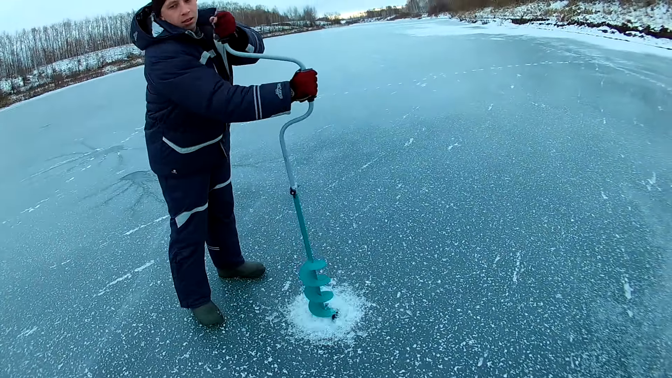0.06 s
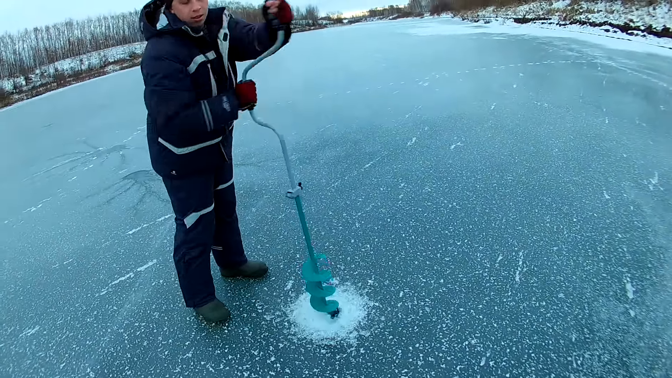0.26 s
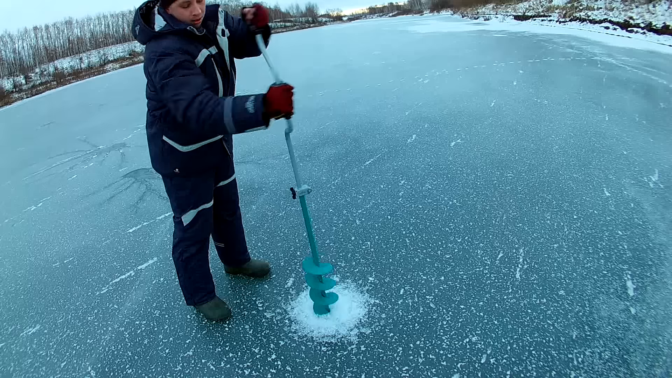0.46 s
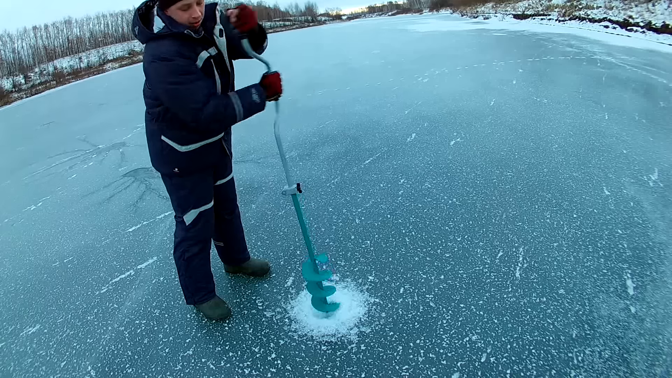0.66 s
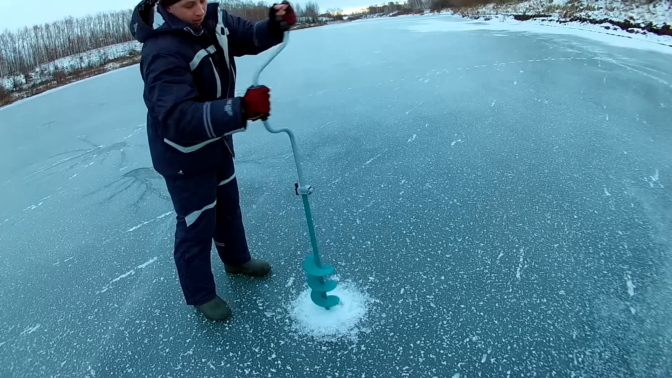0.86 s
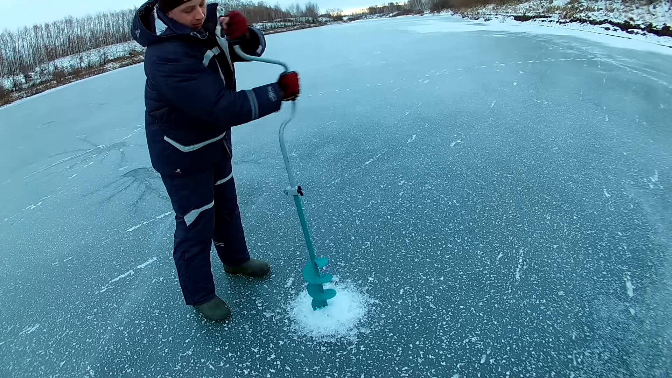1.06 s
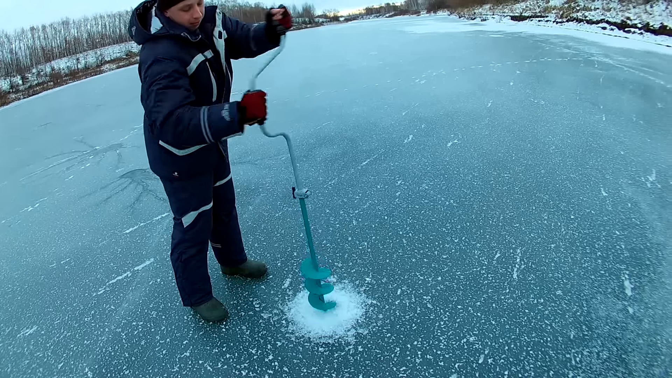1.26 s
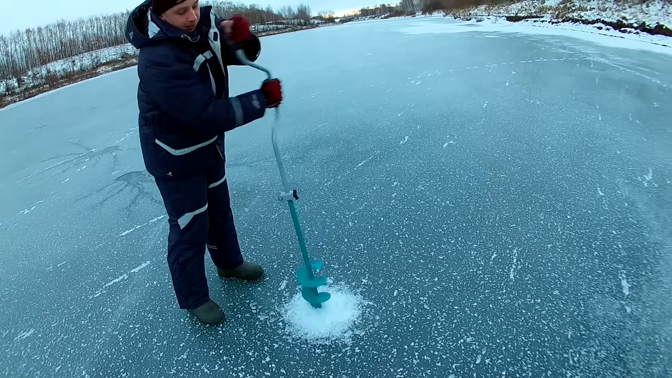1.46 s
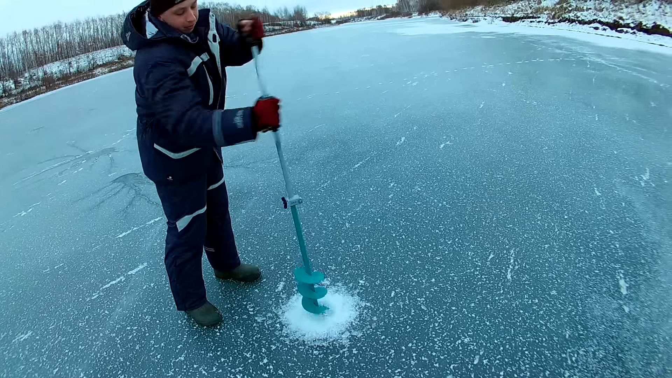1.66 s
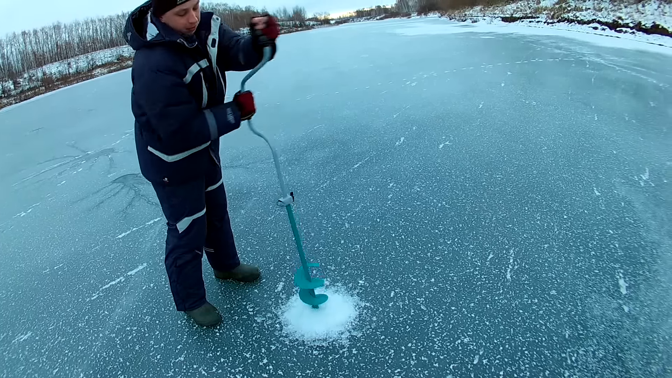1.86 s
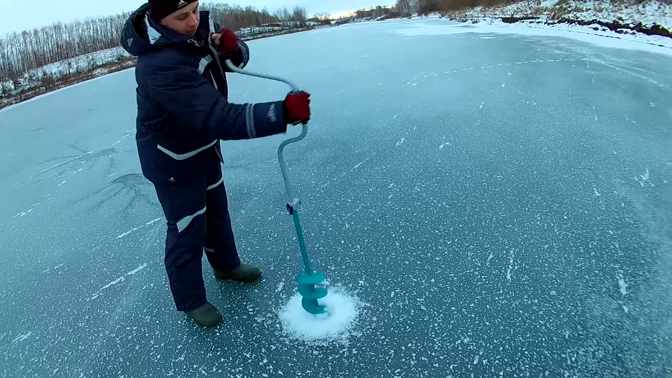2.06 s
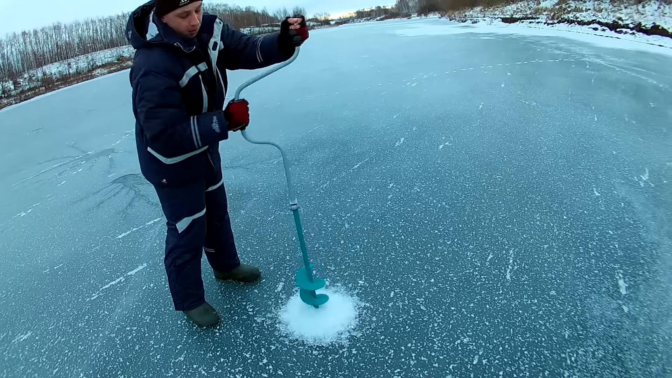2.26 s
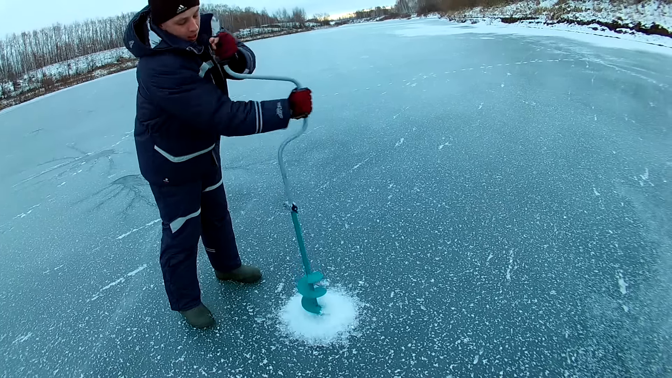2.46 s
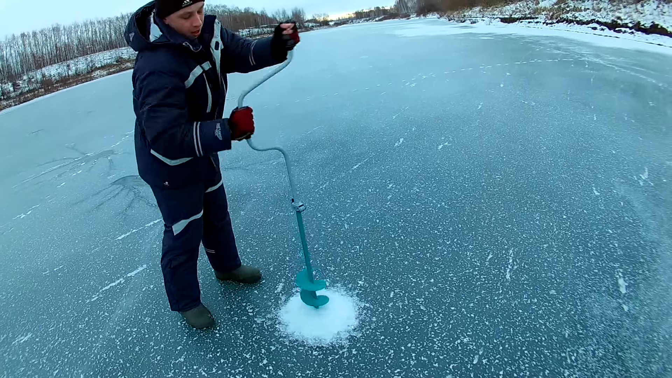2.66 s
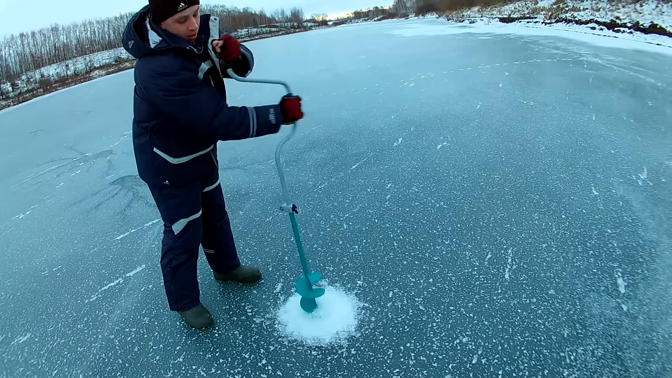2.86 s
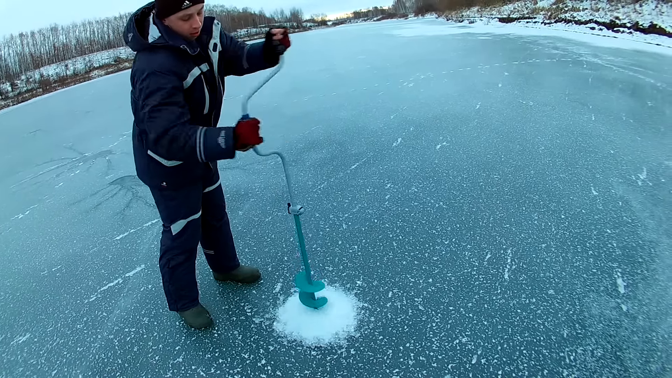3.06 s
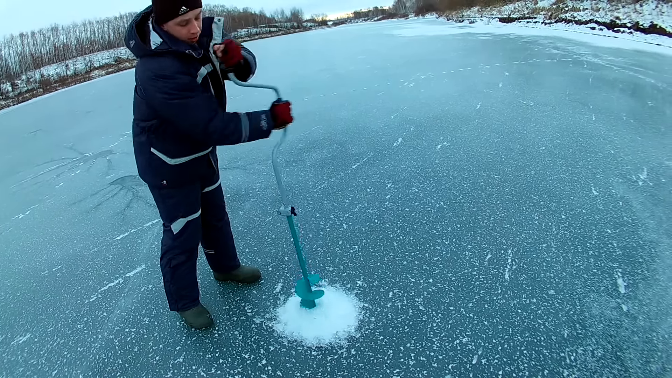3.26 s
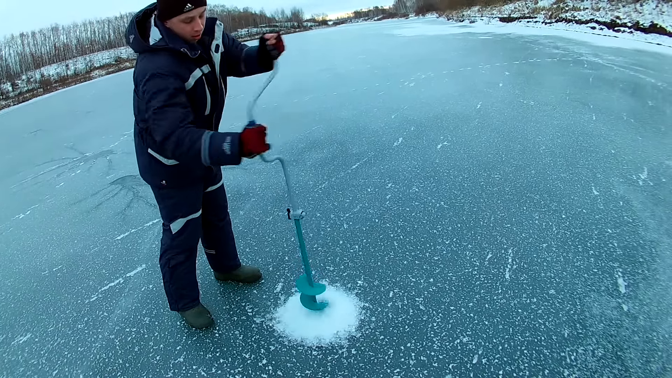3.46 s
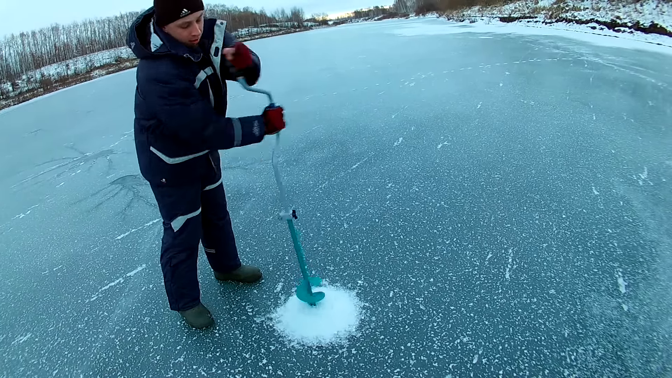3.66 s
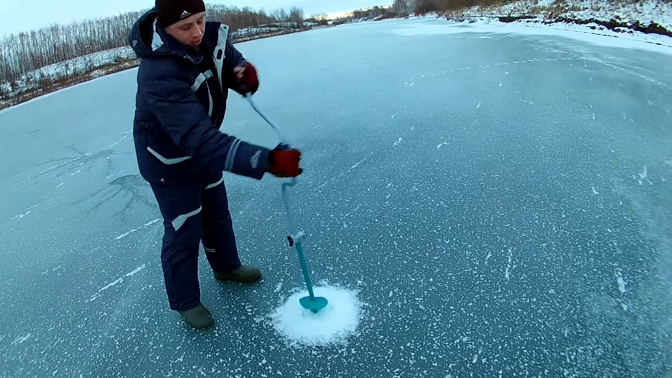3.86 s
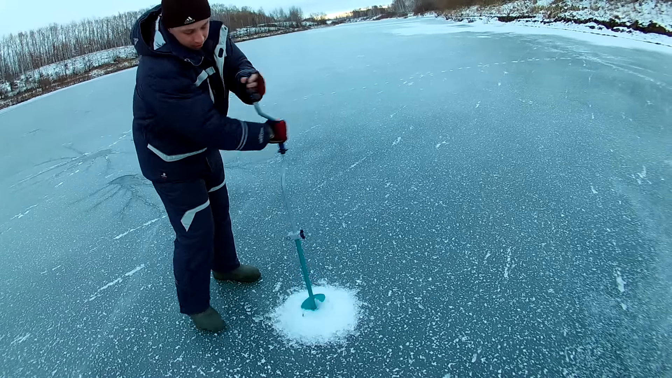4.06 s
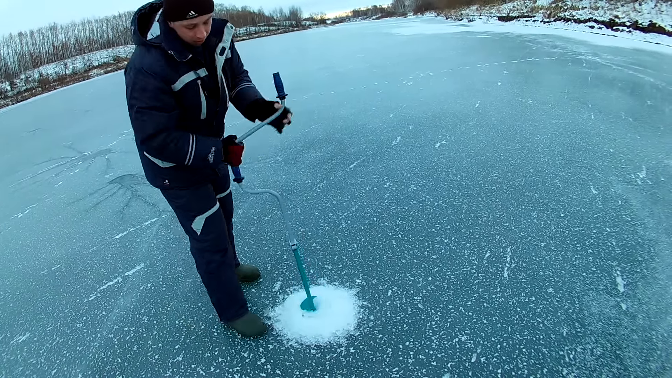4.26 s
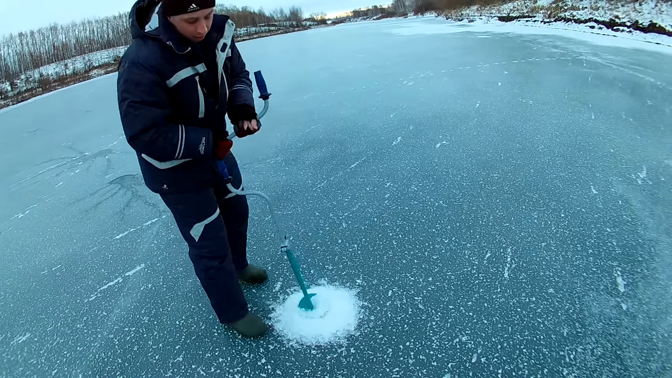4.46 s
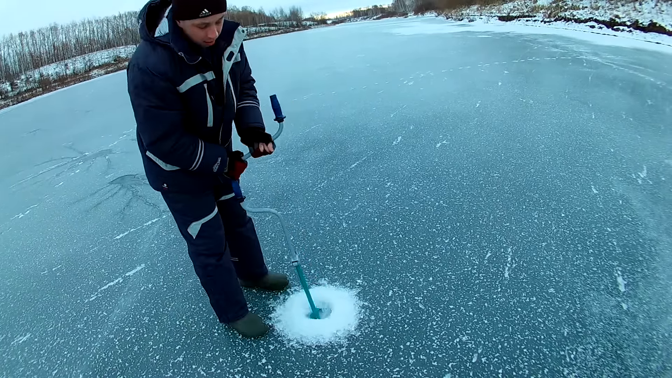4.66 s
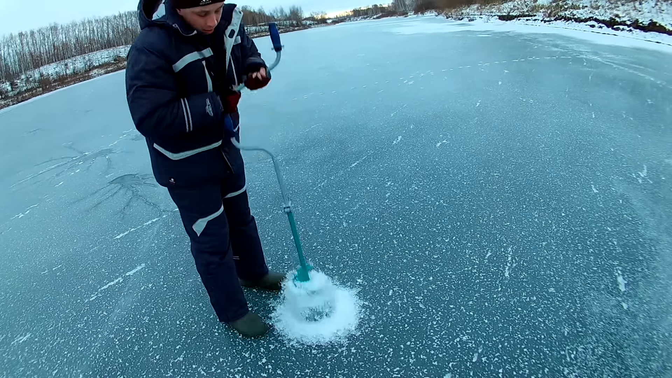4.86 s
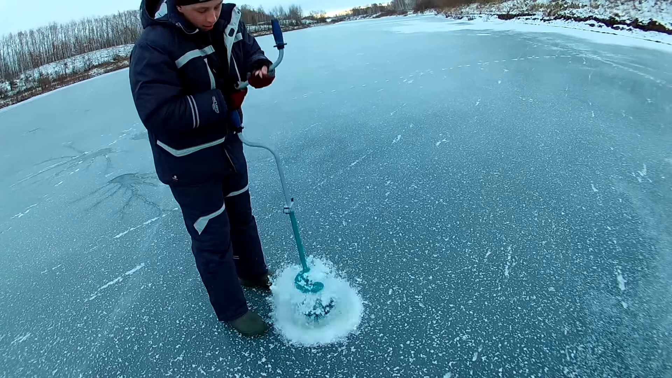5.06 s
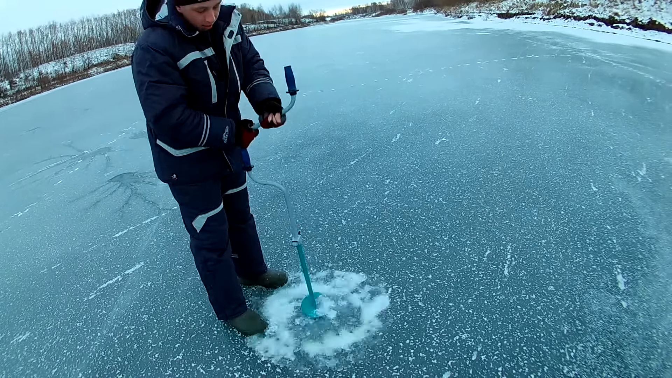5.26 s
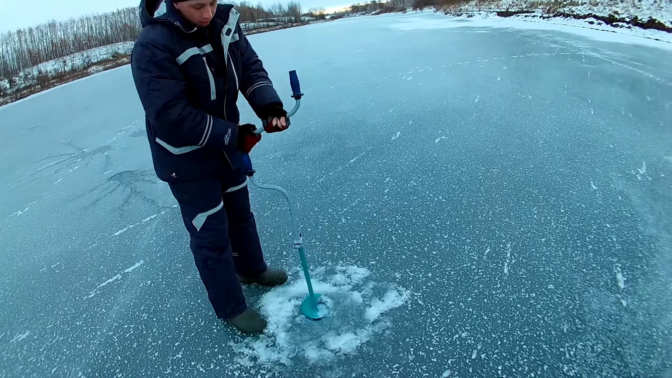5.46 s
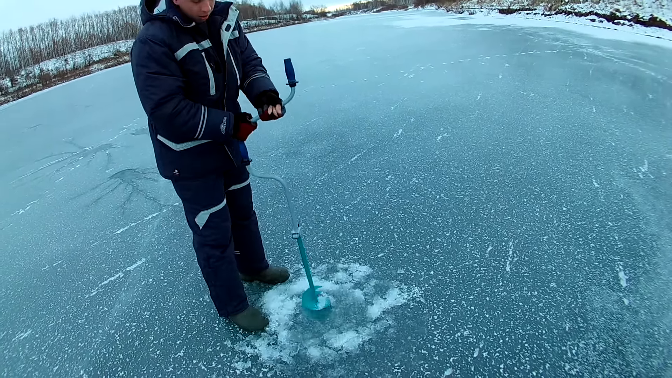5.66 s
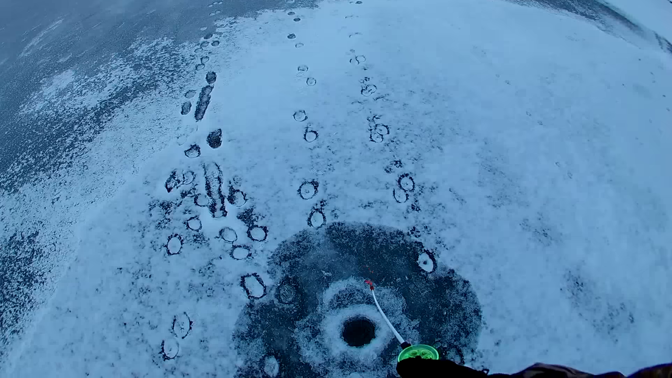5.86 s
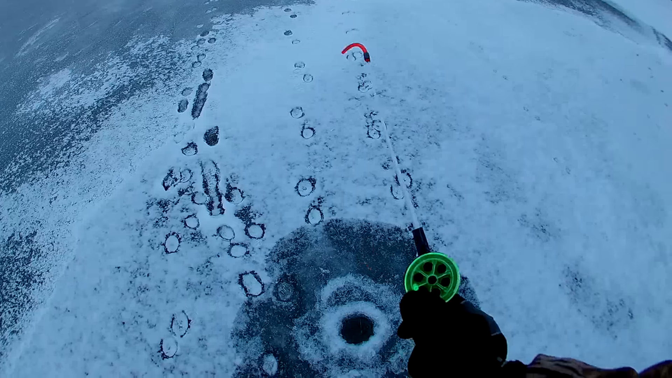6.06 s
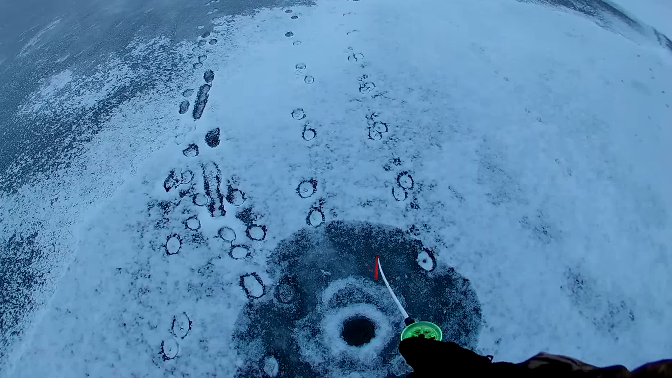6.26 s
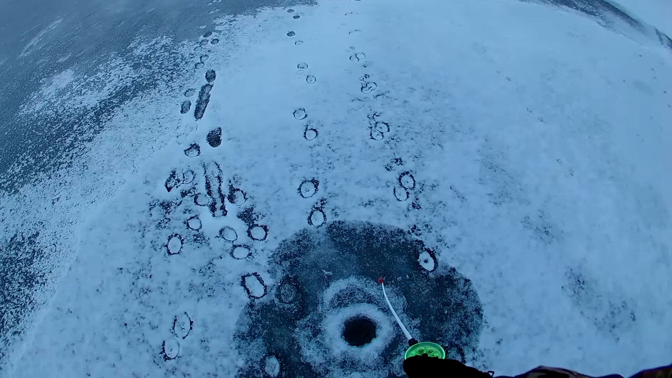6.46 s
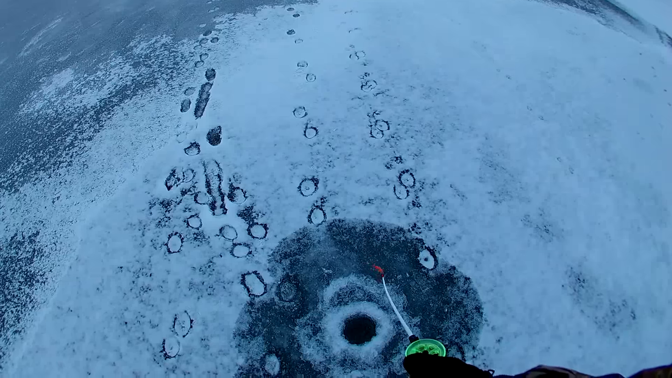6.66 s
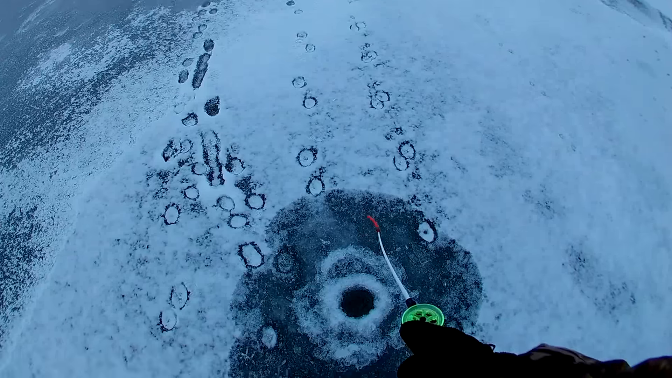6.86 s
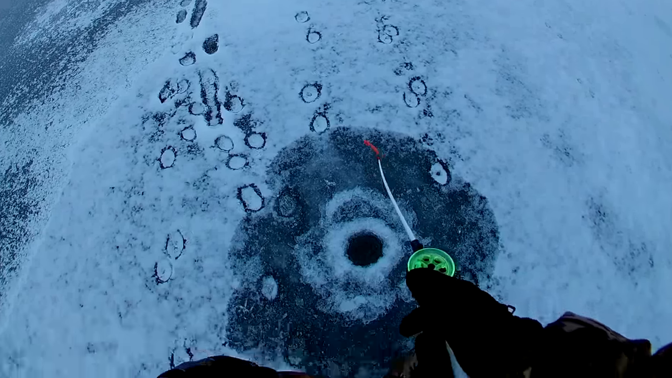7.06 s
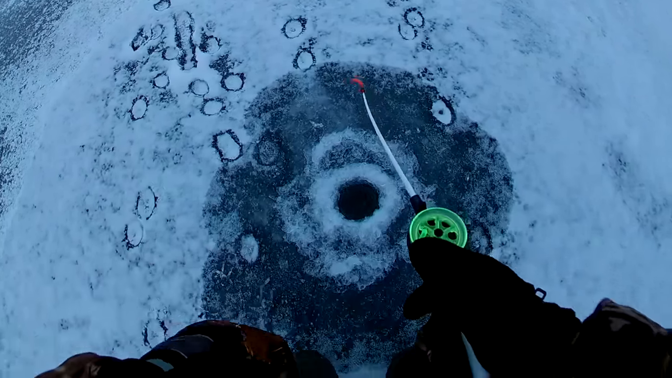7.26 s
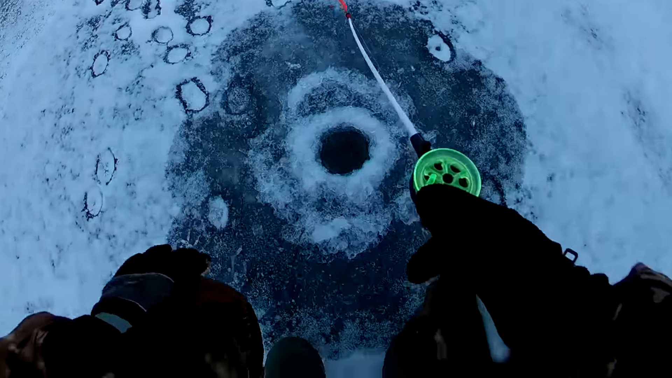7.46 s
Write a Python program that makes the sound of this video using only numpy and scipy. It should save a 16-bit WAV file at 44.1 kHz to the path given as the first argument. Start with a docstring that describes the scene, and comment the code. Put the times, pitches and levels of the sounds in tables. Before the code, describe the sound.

Gritty scraping and crunching pulses about five times every two seconds, with metallic ringing and sharp snaps from thick ice flakes. The grinding suddenly stops at breakthrough, followed by dull slush stirring, a faint squeak, hollow glugs, splashes and stray drips. The close microphone catches soft wind buffets. A hard switch leaves only faint open-air wind, then cloth rustle and light rod and reel clicks.

```python
"""Up close, a hand auger shaves pond ice: chips snap off and ring the steel flight and the deepening bore.
The blades break through; the free auger stirs slush, and water surges, gulps and spills in the hole.
Then the scene switches to a quiet fishing spot: faint wind, rustling clothes, a few ticks of rod and reel.
Random grains through resonances make steel, ice, cloth and spray; swelling tones make the trapped air;
filtered noise makes the wind and the buffets on the microphone."""
import sys
import numpy as np
from scipy import signal
from scipy.fft import rfft, irfft, next_fast_len
from scipy.io import wavfile
from scipy.ndimage import uniform_filter1d, map_coordinates

SR = 44100
rng = np.random.default_rng(int(sys.argv[2]) if len(sys.argv) > 2 else 0)


def generate_wav(sig):
    """Save sig (samples, or channels by samples) to the path in sys.argv[1] as 16-bit PCM at SR."""
    pcm = np.round(np.clip(np.atleast_2d(sig).T, -1, 1) * 32767).astype(np.int16)
    wavfile.write(sys.argv[1], SR, pcm)


N = 331632
T = np.arange(N) / SR
SIZE = next_fast_len(N + SR // 2, True)  # padded, so that filter tails do not wrap into the start
HZ = np.fft.rfftfreq(SIZE, 1 / SR)
THROUGH_S = 3.797  # the blades break through
SWITCH_S = 5.798  # the scene switches to the fishing spot
STROKE_ATTACK, STROKE_RELEASE = 0.77, 1.16  # shares of a stroke's length


def amp(db):
    """Amplitude factor for a level in dB."""
    return 10 ** (np.asarray(db) / 20)


def unit(x):
    """Scales to rms 1."""
    return x / np.sqrt(np.mean(x ** 2) + 1e-20)


def steady(x, span):
    """Evens the rms to about 1 over every span of seconds; faster grain stays."""
    power = np.abs(uniform_filter1d(x ** 2, int(span * SR) + 1))
    return x / np.sqrt(power + 1e-6 * np.mean(x ** 2))


def wobble(rate):
    """A smooth random curve, rate knots a second."""
    knots = rng.standard_normal(int(N * rate / SR) + 4)
    return map_coordinates(knots, [T * rate], order=2)


def after(s, fade):
    """Rises from 0 to 1 around time s."""
    return 0.5 + 0.5 * np.tanh((T - s) / fade)


def swell(s, rise, fall):
    """Climbs to 1 at time s and dies away; rise and fall reach to about half of that."""
    t = T - s
    return np.exp(1 - np.hypot(1, 1.437 * t / np.where(t < 0, rise, fall)))


def strokes(rows):
    """Summed power of (peak s, length s, dB) gestures that share one attack and release."""
    power = 0
    for s, length, db in rows:
        side = length * np.where(T < s, STROKE_ATTACK, STROKE_RELEASE)
        power = power + amp(db) ** 2 * np.exp(-((T - s) / side) ** 2)
    return power


def colour(points):
    """Causal (minimum-phase) response with the gain of the (Hz, dB) points."""
    f, db = np.transpose(points)
    gain_db = np.interp(np.log(HZ + 1), np.log(f), db)
    cepstrum = irfft(np.log(amp(gain_db)), SIZE)
    # folding the cepstrum forward makes the response causal
    cepstrum[1:SIZE // 2] *= 2
    cepstrum[SIZE // 2 + 1:] = 0
    return np.exp(rfft(cepstrum))


def modes(rows):
    """Causal response of a few (Hz, width Hz, dB) resonances with alternating signs."""
    response = 0
    for k, (hz, width, db) in enumerate(rows):
        resonance = 1j * HZ * width / (hz * hz - HZ * HZ + 1j * HZ * width)
        response = response + (-1) ** k * amp(db) * resonance
    return response


def filtered(x, response):
    """Passes a signal through a frequency response."""
    return irfft(rfft(x, SIZE) * response, SIZE)[:N]


def grains(rate, scatter):
    """Random impulses, rate a second, of uneven, log-normal size, rms 1."""
    size = np.exp(scatter * np.clip(rng.standard_normal(N), -2, 2))
    present = rng.random(N) < rate / SR
    return unit(present * size * rng.choice([-1, 1], N))


def bursts(rate, fall, base):
    """Uneven envelope of sudden starts, whose power dies away in fall seconds, rms 1."""
    kicks = (rng.random(N) < rate / SR) * rng.uniform(0.45, 1, N) ** 2
    power = base + signal.lfilter([1], [1, -np.exp(-1 / (fall * SR))], kicks)
    return unit(np.sqrt(power))


def strikes(times, db, response):
    """Single blows that each ring a body up to the given peak."""
    samples = np.round(np.asarray(times) * SR).astype(int)
    blows = np.bincount(samples, amp(db), N)[:N]
    return filtered(blows, response / np.abs(irfft(response, SIZE)).max())


def ping(t, hz, cycles, climb):
    """A shard or bubble rings for some cycles; a bubble also climbs in pitch."""
    age = t * hz / cycles
    tone = np.sin(2 * np.pi * hz * t * (1 + climb * age / 2))
    return tone * np.exp(-age) * (1 - np.exp(-2 * t * hz))


def cloud(count, hz, spread, cycles, climb):
    """A dense cloud of pings, each with its own pitch and size, rms 1."""
    t = np.arange(int(4 * SR * cycles / hz)) / SR
    pitch, size = np.clip(rng.standard_normal((2, count, 1)), -2, 2)
    rings = amp(6.9 * size) * ping(t, hz * np.exp(spread * pitch), cycles, climb)
    places = rng.integers(0, N, (count, 1)) + np.arange(len(t))
    return unit(np.bincount(places.ravel(), rings.ravel())[:N])


# Spectrum of the faint wind. Each row: frequency in Hz, relative level in dB per Hz.
WIND_SPECTRUM = [(20, -7.5), (60, -11.5), (120, -12), (200, -15.5), (300, -12.5), (400, -22), (490, -13),
                 (620, -21), (980, -15.5), (1350, -29.5), (1750, -36.5), (2600, -44.5), (5000, -48.5),
                 (15000, -53)]
# Spectrum of buffets at the microphone, also for nudges. Each row: frequency in Hz, relative level in dB per Hz.
BUFFET_SPECTRUM = [(15, 1), (35, -4.5), (80, 0.5), (160, -13.5), (350, -20.5), (900, -63)]
# Soft buffets on the microphone. Each row: peak in seconds, length in seconds, level in dB.
PUFFS = [(0, .1, -45), (.98, 0.17, -37), (1.35, 0.089, -38), (1.75, 0.11, -42.5), (4.24, .03, -35.5),
         (4.69, .04, -42)]
BREEZE_DB = -52  # steady buffeting beneath the puffs


def air():
    """Faint wind over the open ice is coloured noise; soft buffets reach the microphone while drilling."""
    wind = unit(filtered(rng.standard_normal(N), colour(WIND_SPECTRUM)))
    far = amp(-48.0 + 0.6 * wobble(12.0)) * wind
    breeze = np.hypot(amp(BREEZE_DB), np.sqrt(strokes(PUFFS)))
    puffs = breeze * unit(filtered(rng.standard_normal(N), colour(BUFFET_SPECTRUM)))
    return far + puffs * (1 - after(SWITCH_S, fade=0.002))


# The angler shifts and nudges the microphone. Each row: peak in seconds, length in seconds, level in dB.
NUDGES = [(6.74, 0.053, -43.5), (7.2, 0.0624, -32), (7.42, .07, -38.5)]
# Spectrum of rustling clothes. Each row: frequency in Hz, relative level in dB per Hz.
CLOTH_SPECTRUM = [(200, -0.5), (1100, 1), (1900, -8), (2500, -17), (3700, -15.5), (6000, -25.5),
                  (8000, -36), (15000, -57)]
# A sleeve brushes past. The single row: peak in seconds, length in seconds, level in dB.
SLEEVE_BRUSH = (7.44, 0.023, -45)
# Ticks of rod and reel. Each row: start in seconds, peak of the tick, rebound included, in dB.
TICKS = [(6.88, -25.5), (7.113, -13.5), (7.223, -26), (7.248, -23), (7.281, -26), (7.312, -30),
         (7.328, -34), (7.509, -29.5)]
# Resonances of the plastic rod and reel. Each row: frequency in Hz, width in Hz, relative level in dB.
REEL_MODES = [(752, 130, 2), (1090, 107, 7.5), (1600, 170, 1.5), (2100, 350, -4.5), (3510, 350, -8.5),
              (5300, 510, -18), (10500, 2500, -40)]
RUSTLE_DB, RUSTLE_START_S, RUSTLE_RISE_S = -44, 6.904, 0.14  # clothes begin to move


def angler():
    """Clothes rustle as fine grains and nudge the microphone; the plastic rod and reel tick when struck."""
    rumble = steady(filtered(rng.standard_normal(N), colour(BUFFET_SPECTRUM)), span=0.15)
    nudges = np.sqrt(strokes(NUDGES)) * rumble
    rustle = amp(RUSTLE_DB) * after(RUSTLE_START_S, RUSTLE_RISE_S)
    motion = np.hypot(rustle, np.sqrt(strokes([SLEEVE_BRUSH])))
    fibres = unit(filtered(grains(rate=5000, scatter=0.52), colour(CLOTH_SPECTRUM)))
    cloth = motion * amp(2.1 * wobble(25)) * fibres
    s, db = np.transpose(TICKS)
    rebound = 1 + 0.21 * np.exp(-2j * np.pi * HZ * 0.0027)  # the loose reel rebounds once, 2.7 ms later
    return nudges + cloth + strikes(s, db, modes(REEL_MODES) * rebound)


# Spectrum of stirred wet shavings. Each row: frequency in Hz, relative level in dB per Hz.
SLUSH_SPECTRUM = [(60, -18), (125, -12), (170, 9.5), (250, 6.5), (410, 8), (620, -3.5), (800, 3.5),
                  (1050, 3), (1500, -7.5), (2100, -20.5), (6000, -41.5)]
# Spectrum of trickle and spray, also for surges. Each row: frequency in Hz, relative level in dB per Hz.
SPRAY_SPECTRUM = [(600, -16), (1500, 5.5), (2100, -3), (3000, 0), (3700, -1), (4450, -12), (5300, -3.5),
                  (6800, -13.5), (9000, -22), (10800, -16.5), (12500, -32.5), (15000, -36)]
# The auger coasts, then is shoved and lifted in the wet hole. Each row: peak in seconds, rise in seconds,
# fall in seconds, slush level in dB, trickle level in dB.
STIRS = [(3.84, 0.083, 0.12, -28, -44), (4.22, 0.11, 0.082, -36.5, -45), (4.8, 0.11, 0.26, -29, -46),
         (5.28, 0.12, 0.15, -29.5, -37.5)]
SLUSH_REST_DB, TRICKLE_REST_DB = -44.5, -55.5  # levels between the stirs


def slush():
    """The free auger stirs wet shavings as dull grains; water trickles over the ice as fizz and bubbles."""
    slush_level, trickle_level = amp(SLUSH_REST_DB), amp(TRICKLE_REST_DB)
    for s, rise, fall, slush_db, trickle_db in STIRS:
        motion = swell(s, rise, fall)
        slush_level = np.hypot(slush_level, amp(slush_db) * motion)
        trickle_level = np.hypot(trickle_level, amp(trickle_db) * motion)
    shavings = filtered(grains(rate=700, scatter=0.26), colour(SLUSH_SPECTRUM))
    stir = slush_level * steady(shavings, span=0.05)
    bubbles = cloud(count=1500, hz=3255, spread=0.51, cycles=25, climb=0.019)
    fizz = grains(rate=2500, scatter=0.42) + 0.15 * bubbles
    trickle = trickle_level * steady(filtered(fizz, colour(SPRAY_SPECTRUM)), span=0.092)
    return (stir + trickle) * after(THROUGH_S, fade=0.004)


# Gulps of air down the bore. Each row: start in seconds, length in seconds, start pitch in Hz and end pitch
# in Hz before the waver, level in dB before the flutter.
GULPS = [(4.95, .098, 316, 364, -21.5), (5.11, .071, 436, 354, -20.5), (5.215, .065, 523, 336, -22.5),
         (5.297, 0.043, 304, 255, -8), (5.346, 0.034, 635, 502, -10.5)]
# Stray drops. Each row: start in seconds, starting pitch in Hz, level in dB before the ping's decay.
DRIPS = [(5.071, 1250, -24), (5.138, 1095, -17), (5.155, 876, -23), (5.663, 824, -25), (5.727, 1220, -20)]


def gulps():
    """Air sucked past the flight rings in gliding notes; stray drops plink."""
    out = np.zeros(N)
    waver, flutter = np.exp(0.082 * wobble(120)), amp(1.6 * wobble(90))
    for s, length, start_hz, end_hz, db in GULPS:
        u = np.linspace(0, 1, int(length * SR))
        near = int(s * SR) + np.arange(len(u))
        hz = (start_hz + (end_hz - start_hz) * u) * waver[near]
        tone = np.sin(2 * np.pi * np.cumsum(hz) / SR)
        out[near] += amp(db) * flutter[near] * np.sin(np.pi * u ** 0.55) * tone
    t = np.arange(SR // 16) / SR
    for s, hz, db in DRIPS:
        out[int(s * SR):][:len(t)] += amp(db) * ping(t, hz, cycles=8.2, climb=0.025)
    return out


# Spectrum of water slapping the rim. Each row: frequency in Hz, relative level in dB per Hz.
SLAP_SPECTRUM = [(120, -36), (300, -1), (550, -9.5), (800, 6), (950, 7), (1250, 3.5), (1600, -2.5),
                 (2200, -17), (6000, -81)]
# Water surges. Each row: peak in seconds, rise in seconds, air pocket pitch in Hz before its wander,
# pocket level in dB before its flutter, slap level in dB and spray level in dB before the sudden onset's gain.
SURGES = [(4.43, 0.0072, 390, -5, -20, -35), (4.494, 0.0072, 370, -20.5, -29, -43),
          (4.642, 0.013, 383.7, -9.5, -22.5, -34), (4.666, .005, 442, -13.5, -16.5, -25),
          (4.696, 0.017, 329.7, -5.5, -13.5, -29.5), (4.797, 0.011, 377, -16.5, -29, -36.5),
          (4.825, 0.0044, 420.7, -14.5, -18, -29), (4.844, .003, 427, -6, -15, -27.5),
          (4.875, 0.009, 398, -13.5, -19, -35), (4.907, 0.026, 426.7, -9.5, -16, -31),
          (5.113, 0.009, 413, -33, -20.5, -31), (5.204, 0.0037, 409, -20.5, -18, -29),
          (5.237, 0.026, 425.3, -14, -23.5, -41), (5.291, .0048, 319.5, -17, -21, -35.5),
          (5.346, .016, 445, -7.5, -16.5, -33), (5.443, 0.0034, 351, -18.5, -44.5, -58),
          (5.485, 0.004, 488, -23, -28.5, -43), (5.523, 0.0028, 416, -29, -38, -43),
          (5.693, 0.0045, 298, -23.5, -30.5, -40.5), (5.754, 0.0088, 298, -12.5, -19.5, -34),
          (5.787, 0.044, 363, -23.5, -24, -38.5)]
SURGE_FALL_S, FALL_PER_RISE = 0.011, 0.68  # a slower surge also ebbs more slowly


def surges(wander, wander_rate):
    """Each shove of water squeezes an air pocket in the bore, slaps the rim and throws a sudden spray."""
    pocket, slap_power, spray_power = np.zeros((3, N))
    phase = 2 * np.pi * np.cumsum(np.exp(wander * wobble(wander_rate))) / SR
    for s, rise, hz, pocket_db, slap_db, spray_db in SURGES:
        shove = swell(s, rise, SURGE_FALL_S + FALL_PER_RISE * rise)
        onset = 0.5 + 0.67 * np.clip((T - s + rise) / 0.00074, 0, 1)  # more than doubles within 0.74 ms
        struck = shove * onset
        pocket += amp(pocket_db) * shove * np.sin(hz * phase)
        slap_power += (amp(slap_db) * struck) ** 2
        spray_power += (amp(spray_db) * struck) ** 2
    drops = grains(rate=1700, scatter=0.63)
    bubbles = cloud(count=2400, hz=795, spread=0.327, cycles=5.6, climb=0.07)
    water = unit(filtered(drops, colour(SLAP_SPECTRUM))) + 1.25 * bubbles
    droplets = cloud(count=2600, hz=2933, spread=0.36, cycles=19, climb=0.038)
    spatter = drops + 0.84 * grains(rate=6300, scatter=0.4)
    gusty_spatter = bursts(rate=98, fall=0.0028, base=0.3) * spatter
    mist = filtered(gusty_spatter + 0.56 * droplets, colour(SPRAY_SPECTRUM))
    slap = np.sqrt(slap_power) * steady(water, span=0.034)
    spray = np.sqrt(spray_power) * steady(mist, span=0.035)
    return pocket * amp(3.0 * wobble(180)) + slap + spray


def squeak():
    """The wet auger chirps faintly, a wavering tone and its octave, as it is first pushed down."""
    phase = 2 * np.pi * np.cumsum(1990 * np.exp(0.0145 * wobble(200))) / SR
    chirp = np.sin(phase) + 0.5 * np.sin(2 * phase)
    return amp(-45) * np.exp(-((T - 4.386) / 0.0083) ** 2) * chirp


# Modes of the blades and flight. Each row: frequency in Hz, width in Hz, relative level in dB,
# change in dB from first to last turn.
STEEL_MODES = [(582, 18, -9, -9), (913, 45, 1, 5.5), (1021, 60, 1, 7), (1160, 83, 0.5, -3),
               (1302, 52, -0.5, 1.5), (1399, 45, -3, 2.5), (1790, 230, -21.5, 6.5), (2288, 59, -13.5, 8),
               (3305, 67, -31, 4), (5550, 150, -27.5, -4)]


def steel_mode(k):
    """Response of one mode of the auger; it radiates little above twice its pitch."""
    hz, width, db, _ = STEEL_MODES[k]
    return (-1) ** k * modes([(hz, width, db)]) / (1 + (HZ / (2 * hz)) ** 4)


def flight(chips, shift_db, shift_rate):
    """As the blades travel round and sink into the hole, each steel mode is driven now more, now less."""
    drive, ring = rfft(chips, SIZE), np.zeros(N)
    depth = np.minimum(T / THROUGH_S, 1) - 0.5  # centred on half depth
    for k, (*_, sink_db) in enumerate(STEEL_MODES):
        level = amp(sink_db * depth + shift_db * wobble(shift_rate))
        ring += level * irfft(drive * steel_mode(k), SIZE)[:N]
    return steady(ring, span=0.085)


# Spectrum of the ice body. Each row: frequency in Hz, relative level in dB per Hz.
ICE_SPECTRUM = [(60, -25), (130, -13.5), (180, -3.5), (300, -1.5), (550, 1.5), (750, 1), (1100, -5.5),
                (2000, -21.5), (6000, -70)]
# The deepening hole. Each row: time in seconds, resonance in Hz, gain in dB.
BORE = [(0, 336, -6), (1.1, 325, -6.5), (1.6, 453, -2), (2.6, 430, 0.5), (3.8, 419, 0)]


def bore(chips, width_hz, ring_db):
    """The hole rings at a pitch that shifts as it deepens; the thinning floor of ice starts to drum."""
    ice = colour(ICE_SPECTRUM)
    thinness = np.minimum(T / THROUGH_S, 1) ** 4
    out = thinness * filtered(chips, ice * modes([(246, 90, 1.4)]))
    times = [s for s, *_ in BORE]
    # crossfade from each resonance to the next
    for share, (_, hz, _) in zip(np.eye(len(BORE)), BORE):
        hole = ice * (0.5 + modes([(hz, width_hz, ring_db)]))
        out += np.interp(T, times, share) * filtered(chips, hole)
    return out


# Spectrum of shards and powder. Each row: frequency in Hz, relative level in dB per Hz.
SHAVINGS_SPECTRUM = [(500, -32), (1400, 3.5), (2100, -1), (3000, 1), (3750, 1), (4350, -9), (5400, -2.5),
                     (6100, -8), (6800, -11.5), (9000, -21), (11000, -15.5), (12500, -34), (14700, -36),
                     (15600, -44)]
# Big chips. Each row: start in seconds, peak of the steel ring in dB, peak of the bore knock in dB.
BIG_CHIPS = [(0.273, -7.5, -23), (1.182, -4.5, -15.5), (1.737, -11, -17), (1.793, -4.5, -7),
             (1.954, -9.5, -19), (2.056, -11, -26), (2.24, -8, -14), (2.435, -9, -16), (2.677, -6.5, -14),
             (3.4, -10, -13), (3.567, -8.5, -13), (3.769, -4, -18), (3.784, -5, -18), (3.84, -14, -29),
             (3.9, -19.5, -37)]
CRACK_DB = -8  # a chip's bright crack, relative to its ring


def big_chips():
    """Now and then a thick flake snaps off, rings the steel and knocks the bore."""
    s, ring_db, knock_db = np.transpose(BIG_CHIPS)
    steel = sum(steel_mode(k) for k in range(len(STEEL_MODES)))
    ring = strikes(s, ring_db, steel)
    crack = strikes(s, ring_db + CRACK_DB, colour(SHAVINGS_SPECTRUM))
    knock = strikes(s, knock_db, colour(ICE_SPECTRUM) * modes([(434, 28, 0)]))
    return ring + crack + knock


# Arm pushes, two to a turn of the crank, that make the steel sing. Each row: peak in seconds,
# length in seconds, relative force in dB, relative crunch in dB.
PUSHES = [(0.353, 0.077, -2, -3), (0.794, 0.12, -2.5, -2.5), (1.206, 0.086, -1.5, 0), (1.561, 0.041, -1, 3),
          (1.912, .05, -1, -3), (2.262, 0.061, 1, 0.5), (2.596, 0.064, 0, -2), (3.008, 0.057, .5, -1.5),
          (3.392, 0.047, 0.5, -6), (3.778, 0.015, 0.5, 3.5)]
# Mostly between pushes, and once more at the breakthrough, the blades bite deep and crunch.
# Each row: peak in seconds, length in seconds, relative force in dB, relative crunch in dB.
BITES = [(0.098, 0.051, -3.5, 0), (0.607, 0.062, -0.5, -1.5), (0.988, 0.056, 0, -.5), (1.43, 0.043, 1, 1.5),
         (1.778, .032, 1, 3.5), (2.139, 0.025, 3, 3), (2.486, 0.042, 0.5, 1), (2.873, 0.025, -1.5, 2),
         (3.25, 0.032, -0.5, 1.5), (3.63, 0.063, -2.5, -2.5), (3.77, 0.028, 6.5, 2.5)]
# What drives the steel. The single row: steady drag in dB, push in dB, bite in dB.
STEEL_DRIVE = (-22, -16.5, -21.5)
# What drives the bore, before its own gain. The single row: steady drag in dB, push in dB, bite in dB.
BORE_DRIVE = (-21, -25, -19.5)
LEAN_IN_DB, LEAN_IN_S = -2.5, 0.32  # the drag starts light
CRUNCH_DRAG_DB, CRUNCH_DB = -29.5, -28  # shaving hiss: steady drag, and base level for the strokes
MUFFLE_DB = -3  # loss of hiss once the blades are at full depth


def cutting():
    """The blades stick and slip; each fracture drives steel and bore, and throws shards and powder."""
    drag = amp(LEAN_IN_DB * np.exp(-(T / LEAN_IN_S) ** 2)) ** 2
    push = strokes(row[:3] for row in PUSHES)
    bite = strokes(row[:3] for row in BITES)
    work = np.array([drag, push, bite])
    steel_level, bore_level = np.sqrt(amp([STEEL_DRIVE, BORE_DRIVE]) ** 2 @ work)
    crushing = strokes((s, length, CRUNCH_DB + crunch_db) for s, length, _, crunch_db in PUSHES + BITES)
    hiss_level = np.sqrt(amp(CRUNCH_DRAG_DB) ** 2 * drag + crushing)

    judder = bursts(rate=85, fall=0.0069, base=0.62)
    chips = judder * grains(rate=850, scatter=0.29)
    powder = judder * grains(rate=6000, scatter=0.37)
    steel = steel_level * flight(chips + 0.65 * powder, shift_db=2.5, shift_rate=14)

    slips = chips + grains(rate=260, scatter=0.17)
    times, _, gains_db = np.transpose(BORE)
    bore_gain = amp(np.interp(T, times, gains_db))
    hole = bore_level * bore_gain * steady(bore(slips, width_hz=61, ring_db=4.5), span=0.09)

    shavings = colour(SHAVINGS_SPECTRUM)
    shards = cloud(count=7000, hz=3820, spread=0.36, cycles=18, climb=0)
    crunch = unit(filtered(powder + 0.5 * chips, shavings)) + 0.73 * unit(filtered(shards, shavings))
    depth = np.minimum(T / THROUGH_S, 1)
    hiss = hiss_level * amp(MUFFLE_DB * depth ** 3) * steady(crunch, span=0.12)
    return (steel + hole + hiss) * (1 - after(THROUGH_S, fade=0.0033))


def scene():
    """Drilling and water at the hole, then the angler at the fishing spot, with wind throughout."""
    low_cut = 1 / (1 + (120 / (HZ + 1)) ** 4)  # thins the water below about 120 Hz
    water = filtered(surges(wander=0.23, wander_rate=260) + gulps(), low_cut)
    drilling = cutting() + big_chips() + slush() + squeak() + water
    return (drilling * (1 - after(SWITCH_S, fade=0.001)) + angler() + air())[None]


# Notches of the microphone port. Each row: frequency in Hz, width in Hz, depth from 0 to 1.
PORT_NOTCHES = [(7890, 670, 0.86), (13400, 350, .75)]
TOP_HZ = 15700  # the band ends here


def record(dry):
    """The microphone port notches the treble, peaks saturate and the band ends steeply."""
    port = np.ones(len(HZ))
    for hz, width, depth in PORT_NOTCHES:
        port *= 1 - np.clip(depth, 0, 1) * np.exp(-((HZ - hz) / width) ** 2)
    x = filtered(dry[0], port)
    x = x / (1 + x ** 8) ** (1 / 8)
    return filtered(x, HZ < TOP_HZ)[None]


dry = scene()
out = record(dry)
generate_wav(out)
```